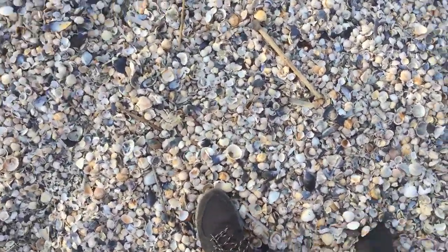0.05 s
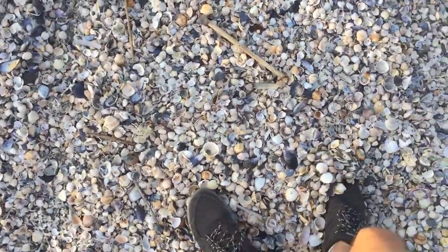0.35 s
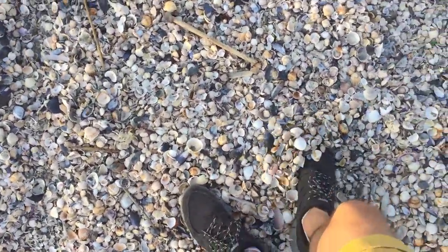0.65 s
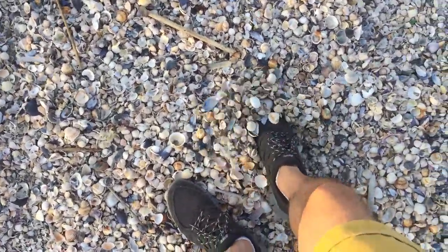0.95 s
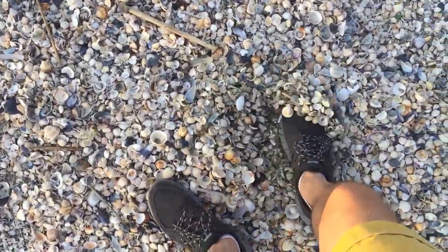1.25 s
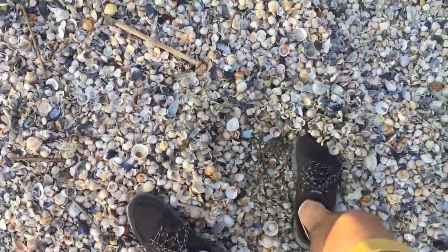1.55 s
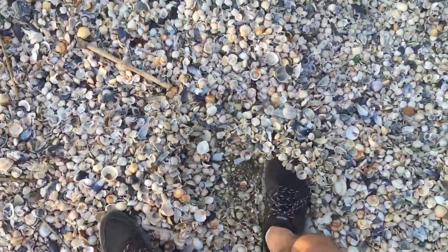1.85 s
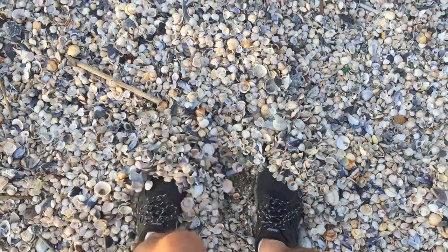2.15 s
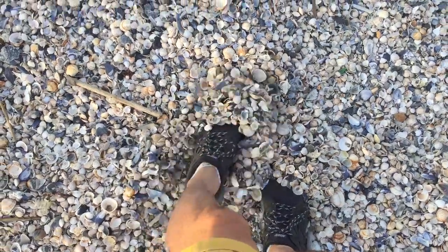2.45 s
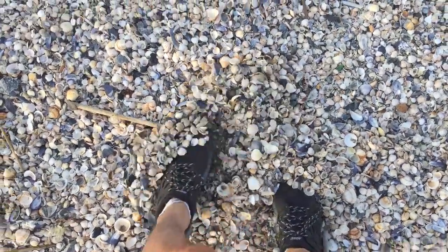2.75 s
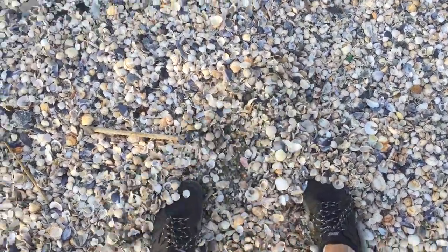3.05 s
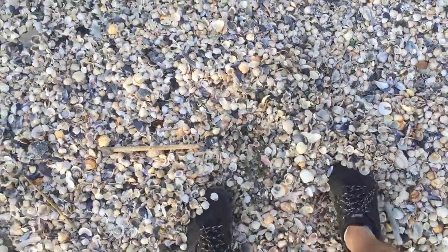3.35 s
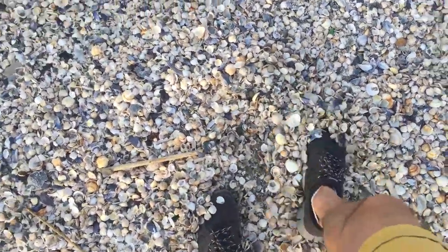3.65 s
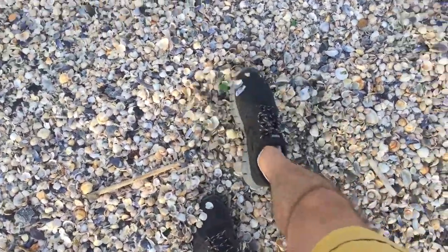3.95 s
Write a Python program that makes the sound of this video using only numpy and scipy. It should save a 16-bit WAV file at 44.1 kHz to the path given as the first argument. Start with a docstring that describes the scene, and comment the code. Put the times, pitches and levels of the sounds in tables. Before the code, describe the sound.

A hissing rattle of seashells rises three times as one shoe, the other, then the first again scrapes through a deep bed. Small clinks and muffled knocks sound close by, while wind lightly bumps the microphone on an open beach.

```python
"""A hissing rattle of loose seashells as shoes plough through a deep bed: right foot, left, right again.
Thousands of tiny contacts make the hiss; single shells clink, deeper ones crunch and knock under the sole.
Outdoors on a beach, close to the feet, with one hand-held microphone and no echo.
Low buffets, probably moving air, hit the microphone over the faint rumble of the beach."""
import sys
import numpy as np
from scipy import signal
from scipy.fft import rfft, irfft
from scipy.io import wavfile

SR = 44100
rng = np.random.default_rng(int(sys.argv[2]) if len(sys.argv) > 2 else 0)


def pcm_store(signal):
    """Save signal as 16-bit PCM."""
    levels = np.round(np.clip(np.atleast_2d(signal), -1, 1) * 32767)
    wavfile.write(sys.argv[1], SR, levels.astype(np.int16).T)


N = 176400  # 4 s


def amp(db):
    """Decibels to gain."""
    return 10 ** (np.asarray(db) / 20)


def unit(x):
    """Scales to rms 1."""
    return x / np.sqrt(np.mean(x ** 2) + 1e-20)


def add(mix, s, sound):
    """Mixes a sound in at time s."""
    part = mix[max(round(s * SR), 0):][:len(sound)]
    part += sound[:len(part)]


def colour(x, spectrum, size=4096):
    """Causal filter shaped by (frequency [Hz], relative level [dB]); keeps the power of white noise."""
    hz, db = np.transpose(spectrum)
    gain = unit(amp(np.interp(np.log(np.fft.rfftfreq(size, 1 / SR) + 1), np.log(hz), db)))
    cepstrum = irfft(np.log(gain + 1e-6))
    cepstrum[1:size // 2] *= 2  # fold to minimum phase
    cepstrum[size // 2 + 1:] = 0
    return signal.oaconvolve(x, irfft(np.exp(rfft(cepstrum))))[:len(x)]


def contacts(per_s, lo_hz, hi_hz, ring_s, spread_db, scrape, size=256):
    """Shells touch at random, each with its own pitch and ring, over fine scraping; even mean power."""
    per_s = np.broadcast_to(per_s, N)
    onsets = np.flatnonzero(rng.random(N) < per_s / SR)
    pitch, length, force, phase = rng.random((N, 4))[onsets].T[:, :, None]
    n = np.arange(size)
    hz = lo_hz + (hi_hz - lo_hz) * pitch
    ring_samples = ring_s * SR * 2 ** (2 * length - 1)
    strength = amp(spread_db * np.minimum(-np.log(1 - force), 4)) / np.sqrt(per_s[onsets, None])
    grains = strength * np.exp(-n / ring_samples) * np.sin(2 * np.pi * (hz * n / SR + phase))
    rattle = np.bincount((onsets[:, None] + n).ravel(), grains.ravel(), N + size)[:N]
    return unit(unit(rattle) + scrape * rng.standard_normal(N))


def tumblers(count=440, scatter_s=.05, ring_s=.002):
    """Whole shells roll along: each is struck seven times and chinks at its own pitch."""
    out, t = np.zeros(N), np.arange(SR // 80) / SR
    for when, pitch, size in rng.random((count, 3)):
        hz = 3000 + 13500 * pitch
        strength = amp(-.7 * np.log(size + .025))
        chink = strength * np.exp(-t / ring_s) * np.sin(2 * np.pi * hz * t)
        delays, forces = rng.standard_normal((2, 7))
        for s, force in zip(when * N / SR + scatter_s * delays, forces):
            if s > 0:
                add(out, s, force * chink)
    return unit(out)


def slips(width_s, depth_db):
    """Shells move in little slips: a quick random gain."""
    hz = np.fft.rfftfreq(N, 1 / SR)
    wander = irfft(rfft(rng.standard_normal(N)) / (1 + (hz * width_s) ** 2), N)
    return unit(amp(depth_db * unit(wander)))


def shell_bed(busy_per_s=7000, busy_db=-27):
    """Underfoot, close by: the harder a shoe pushes, the more shells collide and the louder each is."""
    # Three pushes: (time [s], bed level [dB], relative clatter level [dB], relative crunch level [dB])
    right_push = [(0, -33.5, -2.5, -8), (.07, -32.5, -5, -11), (.14, -27.5, -4, -13),
                  (.25, -31, -2.5, -11.5), (.32, -33, -2.5, -9.5), (.37, -38, -2, -6.5),
                  (.49, -34.5, -5, -9.5), (.6, -35, -2.5, -12), (.81, -29, -6, -15),
                  (.98, -28, -5.5, -14.5), (1.11, -28.5, -6.5, -22), (1.2, -31, -4.5, -8),
                  (1.27, -26.5, -6, -15.5), (1.44, -26.5, -7, -13), (1.57, -31, -5, -22),
                  (1.64, -34.5, -6, -10.5), (1.72, -42, -6.5, -8), (1.79, -46.5, -8, -0.5)]
    left_push = [(1.82, -46.5, -3.5, 1.5), (1.93, -42.5, -2.5, 0.5), (1.959, -36, -5.5, -10.5),
                 (1.985, -28, -1.5, -9.5), (2.02, -27, -1, -17), (2.035, -19.5, -7, -18.5),
                 (2.072, -20.5, -5, -19), (2.085, -24.5, -5, -17), (2.19, -27.5, -4.5, -13.5),
                 (2.3, -26.5, -6.5, -12), (2.35, -23, -6.5, -12.5), (2.5, -23, -6, -15),
                 (2.66, -23.5, -9, -22.5), (2.72, -28.5, -6.5, -15), (2.911, -23.5, -6, -10.5),
                 (3.121, -26.5, -4, -21), (3.16, -31.5, -4, -10.5), (3.24, -34, -4.5, -9),
                 (3.29, -43, -1, -2)]
    right_again = [(3.34, -41.5, -1.5, -1), (3.37, -39, -0.5, -3), (3.41, -34, -3.5, -5.5),
                   (3.47, -35.5, -9, -5), (3.54, -27.5, -6.5, -14), (3.63, -29.5, -6, -13.5),
                   (3.69, -31, -5, -9.5), (3.78, -26, -7.5, -16.5), (3.89, -26.5, -7, -23),
                   (3.93, -22.5, -9, -17.5), (4, -24.5, -4, -26)]
    # Tone of the fine hiss and coarser clatter, including the microphone's fixed colour:
    # (frequency [Hz], relative level [dB])
    hiss_tone = [(2000, -46), (5000, -14.5), (5850, -9), (6300, -1.5), (6900, -3.5), (7800, -4), (8200, 0),
                 (9600, -1), (10500, -7), (11300, -4.5), (13000, -6.5), (15000, -6), (17000, -4)]
    clatter_tone_right = [(1000, -19), (2200, -10.5), (2900, -4), (3350, -2.5), (3750, 1.5), (4150, -4),
                          (4600, -2), (5400, -8.5), (6200, -36.5), (9000, -15)]
    clatter_tone_left = [(1000, -22.5), (2200, -11), (2900, -2.5), (3700, 0.5), (4100, -4), (4600, 1.5),
                         (5400, -9.5), (6200, -18), (9000, -53)]
    # Tone of the deep crunch: (frequency [Hz], relative level [dB])
    crunch_tone = [(100, -17), (300, -3), (500, -10), (750, -3), (1000, 1), (1400, -1.5), (1850, 1.5),
                   (2200, -7), (4000, -15)]
    t = np.arange(N) / SR
    times, *levels = np.vstack([right_push, left_push, right_again]).T
    bed_db, clatter_db, crunch_db = (np.interp(t, times, column) for column in levels)
    per_s = busy_per_s * amp(bed_db - busy_db)

    ticks = contacts(per_s, 2020, 18100, ring_s=.000063, spread_db=0, scrape=.42)
    rings = contacts(per_s, 3930, 17680, ring_s=.00073, spread_db=2, scrape=.58)
    chinks = .3 * tumblers()
    hiss = amp(-.5) * unit(colour(ticks + .67 * rings + chinks, hiss_tone))

    coarse = contacts(.4 * per_s, 1830, 7020, ring_s=.00095, spread_db=1.5, scrape=.82)
    coarse += 1.52 * (ticks + chinks)
    left, right = unit(colour(coarse, clatter_tone_left)), unit(colour(coarse, clatter_tone_right))
    on_left_foot = (t > left_push[0][0]) & (t < left_push[-1][0])
    clatter = amp(clatter_db - 1.5) * np.where(on_left_foot, left, right)

    deep = contacts(900, 217, 2570, ring_s=.0011, spread_db=.5, scrape=.9) + 1.2 * ticks
    crunch = amp(crunch_db - .5) * unit(colour(deep, crunch_tone))
    return amp(bed_db) * slips(width_s=.005, depth_db=.8) * (hiss + clatter + crunch)


def shifting_heap(rattle, patch_db, patch_hz, patch_s):
    """The heap keeps changing shape, so narrow bands of its sound swell and fade."""
    hz, t, bands = signal.stft(rattle, SR, nperseg=512, noverlap=384)
    patches = rng.standard_normal(bands.shape)
    for axis, width in enumerate([patch_hz / hz[1], patch_s / t[1]]):
        bell = np.exp(-(2 * np.arange(-90, 91) / width) ** 2)
        patches = signal.fftconvolve(patches, np.expand_dims(bell, 1 - axis), "same", axes=axis)
    gain = unit(amp(patch_db * unit(patches)))
    return signal.istft(bands * gain, SR, nperseg=512, noverlap=384)[1][:N]


def beach(level_db=-43.5):
    """All around the microphone, the steady faint rumble of open air."""
    # Beach ambience: (frequency [Hz], relative level [dB])
    spectrum = [(20, -12), (45, -5), (68, 1.5), (130, -5.5), (280, -14.5), (500, -23.5), (1000, -12.5),
                (2400, -28), (16000, -57)]
    return amp(level_db) * unit(colour(rng.standard_normal(N), spectrum))


def buffets(edge_s=.019, thump_cycles=.43):
    """Low pressure swings right on the microphone: longer flutters and single thumps."""
    # Flutters: (start [s], length [s], level [dB])
    flutters = [(0.331, .11, -34.5), (0.517, 0.21, -30), (0.73, .13, -48), (2.216, 0.21, -31.5),
                (2.463, 0.062, -33.5), (2.6, 0.12, -43.5), (2.682, .13, -33.5), (3.174, 0.115, -39)]
    # Their rumble: (frequency [Hz], relative level [dB])
    spectrum = [(25, -18), (45, -8), (75, 4.5), (120, -3.5), (200, -6), (300, -21), (500, -32.5),
                (1500, -59)]
    # Single thumps: (time [s], relative level [dB], pitch [Hz])
    thumps = [(.155, -32, 105), (.269, -19.5, 129), (.383, -30, 95), (0.544, -25, 151), (0.572, -29, 110),
              (.632, -24.5, 195), (0.646, -20.5, 190), (.702, -19, 110), (0.849, -30.5, 94),
              (0.907, -26, 90), (0.927, -25.5, 84), (0.964, -33, 272), (1.166, -35, 262),
              (1.26, -31.5, 305), (1.841, -34, 100), (1.912, -24, 84), (2.073, -26.5, 98),
              (2.351, -25, 193), (2.368, -28, 180), (2.685, -25, 126), (2.94, -20.5, 70.4),
              (2.953, -23.5, 111), (3.203, -22.5, 138), (3.287, -28, 80), (3.339, -22.5, 125)]
    t = np.arange(N) / SR
    envelope = np.zeros(N)
    for s, length, db in flutters:
        inside_s = np.minimum(t - s, s + length - t)
        envelope += amp(db) * np.clip(inside_s / edge_s + .5, 0, 1)
    out = envelope * unit(colour(rng.standard_normal(N), spectrum))
    for s, db, hz in thumps:
        cycles = (t - s) * hz
        pulse = 1 / np.cosh(np.clip(2 * cycles / thump_cycles, -20, 20))
        out -= amp(db + 4.5) * pulse * np.cos(2 * np.pi * cycles)
    return out


def clinks(ring_s=.0013):
    """A shell cracks against its neighbour and rings for a moment."""
    # Single shells: (time [s], relative level [dB], ring pitch [Hz], crack decay [s])
    strikes = [(0.3183, -13, 10300, 0.00087), (0.3414, -13, 11400, 0.00081), (.5362, -14, 4200, 0.002),
               (.9855, -6, 6450, 0.00046), (1.056, -21, 6300, .001), (1.428, -15, 9000, .0007),
               (1.506, -13, 6400, .0007), (1.557, -11.5, 9000, 0.0018), (1.683, -20, 11000, .001),
               (1.693, -15.5, 3970, 0.00053), (1.7193, -17, 9300, .0009), (1.7327, -22, 8800, .0007),
               (1.753, -25, 9800, 0.0016), (1.79, -27.5, 9000, 0.0024), (1.834, -29, 6500, .001),
               (1.8985, -17.5, 6460, 0.0021), (2.029, -16, 3580, .003), (2.035, -6.5, 4540, 0.0007),
               (2.052, -17, 8500, .002), (2.065, -10, 4500, 0.0016), (2.075, -18, 8000, .002),
               (3.225, -16, 8950, .001), (3.257, -20, 8900, .001), (3.3595, -19.5, 4300, .002),
               (3.407, -16.5, 8500, .0015), (3.491, -11.5, 9100, 0.00042), (3.981, -14, 3800, .002)]
    crack_spectrum = [(800, -19), (3500, -8), (9000, 2), (17000, -12)]  # (frequency [Hz], level [dB])
    out, t = np.zeros(N), np.arange(SR // 50) / SR
    for s, db, hz, crack_s in strikes:
        crack = colour(rng.standard_normal(len(t)) * np.exp(-t / crack_s), crack_spectrum)
        ring = np.exp(-t / ring_s) * np.sin(2 * np.pi * hz * t)
        add(out, s, amp(db - 7.5) * (.98 * crack + ring))
    return out


def knocks(ring_s=.00064, grit_s=.0043):
    """Buried shells give way under the sole: a short hollow note with muffled grit."""
    # Collapses in the bed: (time [s], relative level [dB], ring pitch [Hz])
    collapses = [(.5385, -19, 1150), (.797, -22, 1170), (.906, -24, 960), (.937, -23, 1140),
                 (.96, -23.5, 1220), (1.229, -21, 1100), (1.25, -19, 1220), (1.257, -16.5, 1010),
                 (1.624, -27.5, 970), (1.838, -25.5, 1060), (1.899, -17.5, 1130), (1.935, -26, 970),
                 (2.44, -20, 1160), (2.853, -18, 940), (2.885, -22, 1240), (2.89, -15, 820),
                 (3.073, -21, 770), (3.127, -17.5, 765), (3.201, -21, 765), (3.22, -18, 756),
                 (3.226, -18.5, 890), (3.237, -16, 780), (3.36, -19.5, 720), (3.371, -18, 850),
                 (3.381, -18, 900), (3.389, -24, 780), (3.408, -19, 1000), (3.418, -18, 880),
                 (3.433, -18.5, 1080), (3.859, -27, 900), (3.875, -19.5, 1730)]
    # Muffled grit: (frequency [Hz], relative level [dB])
    grit_spectrum = [(300, -23.5), (680, 4.5), (1300, 3), (1900, -8.5), (2500, -11), (9000, -7.5)]
    out, t = np.zeros(N), np.arange(SR // 30) / SR
    swell = t / ring_s * np.exp(1 - t / ring_s)
    for s, db, hz in collapses:
        grit = colour(rng.standard_normal(len(t)) * np.exp(-t / grit_s), grit_spectrum)
        note = swell * np.sin(2 * np.pi * hz * t)
        add(out, s, amp(db - 5) * (.5 * grit + note))
    return out


def scene():
    """Everything at one hand-held microphone, in the open with no echo."""
    bed = shifting_heap(shell_bed(), patch_db=1.35, patch_hz=210, patch_s=.035)
    return (bed + beach() + buffets() + clinks() + knocks())[None]


def record(dry):
    """The microphone's bass roll-off at 44 Hz and the recorder's band limit at 17.3 kHz."""
    low_cut = signal.butter(2, 44, "highpass", fs=SR, output="sos")
    band_limit = signal.firwin(511, 17300, window=("kaiser", 9), fs=SR)
    return signal.oaconvolve(signal.sosfilt(low_cut, dry), band_limit[None], "same")


dry = scene()
out = record(dry)
pcm_store(out)
```